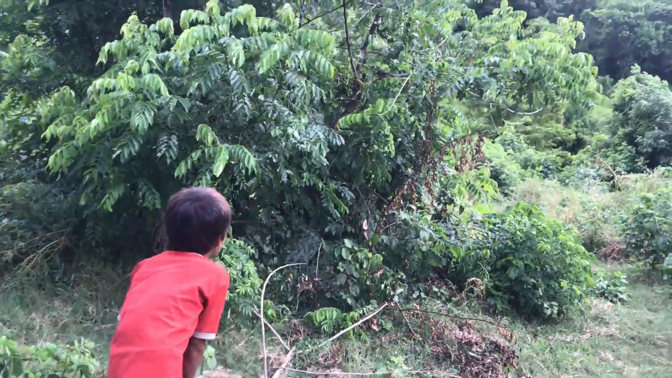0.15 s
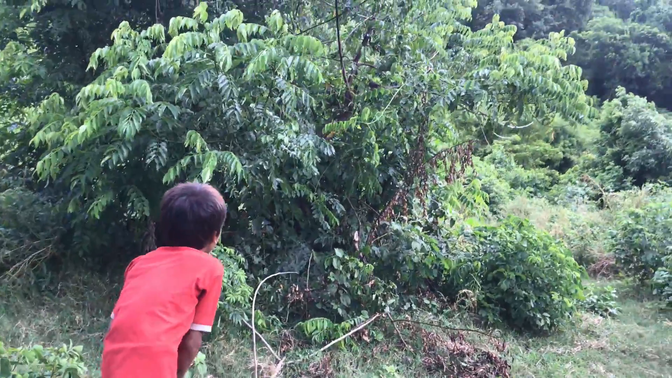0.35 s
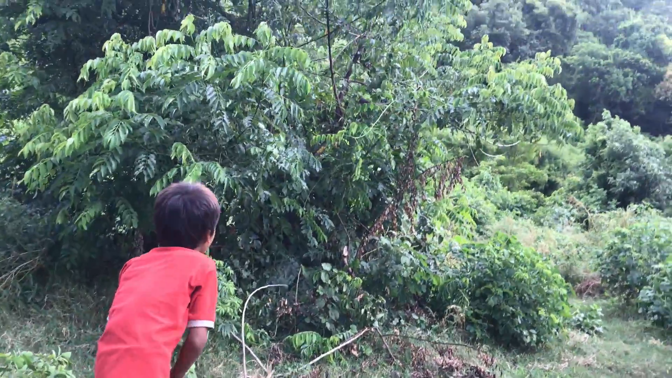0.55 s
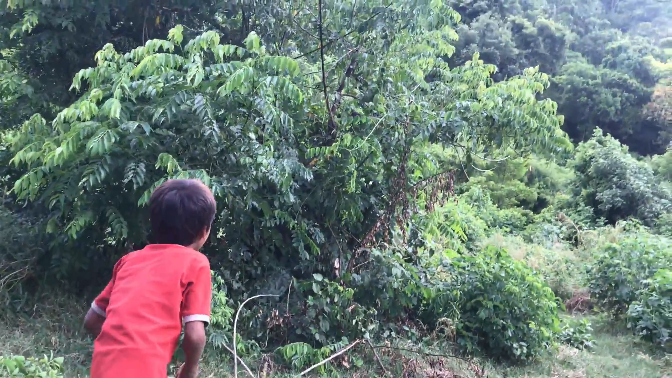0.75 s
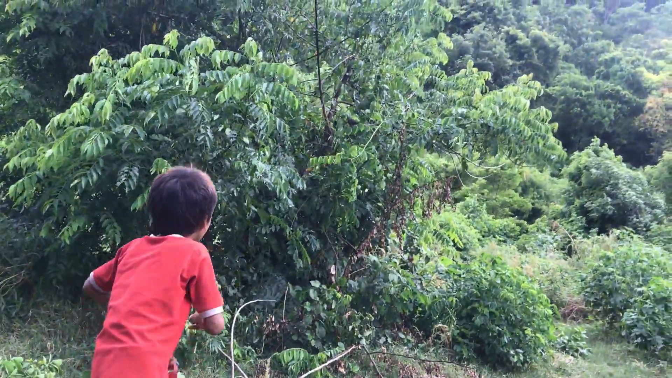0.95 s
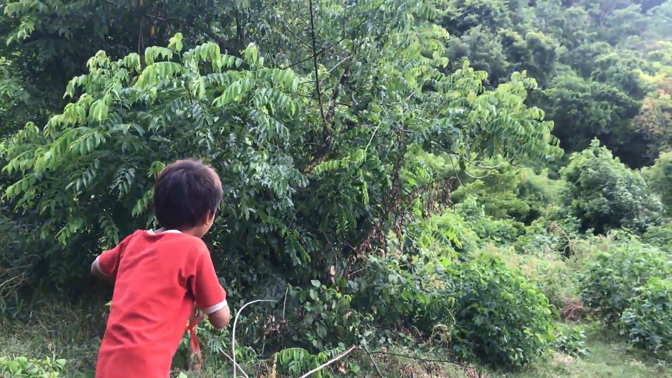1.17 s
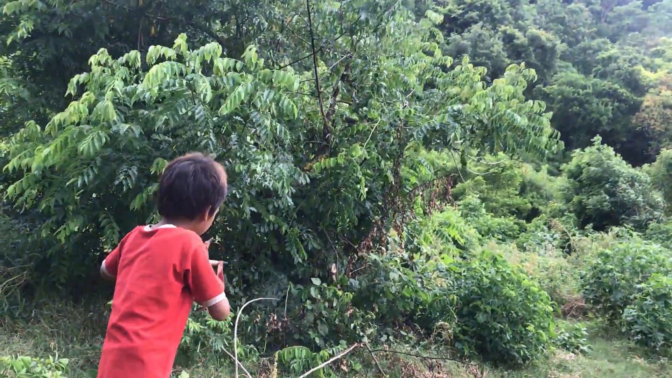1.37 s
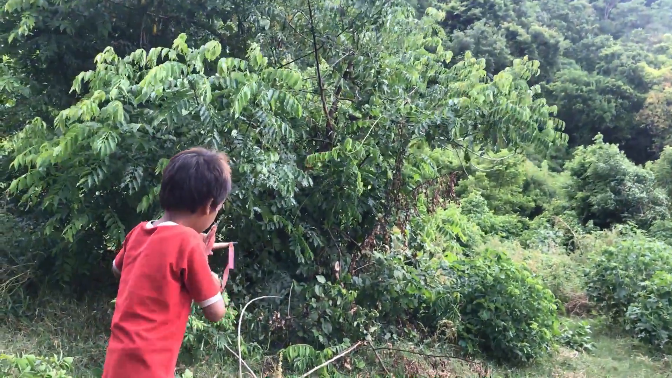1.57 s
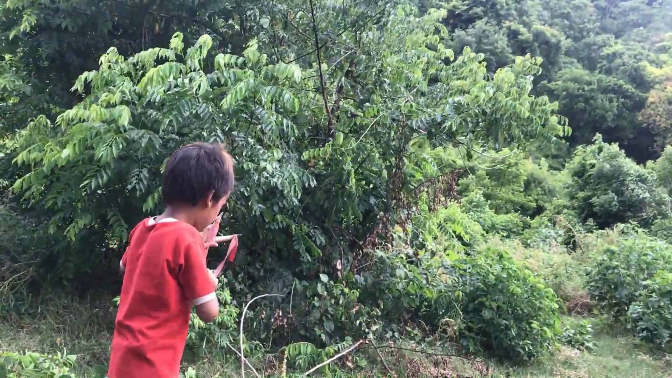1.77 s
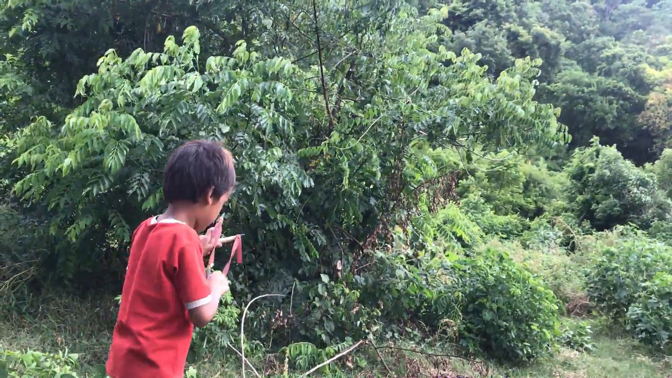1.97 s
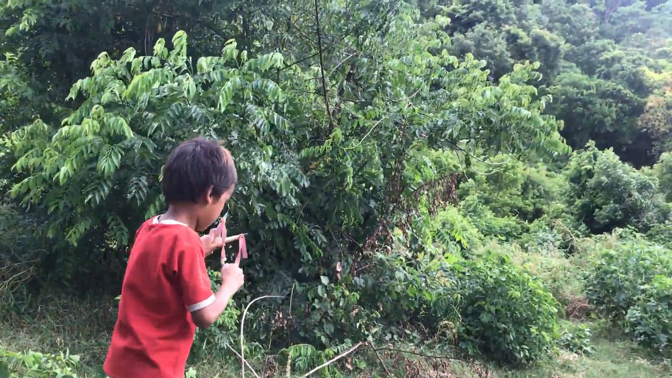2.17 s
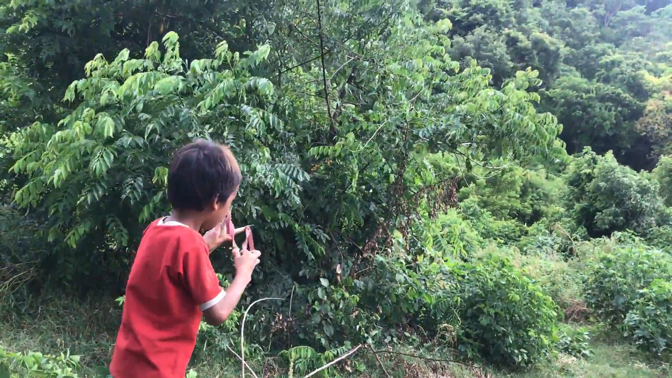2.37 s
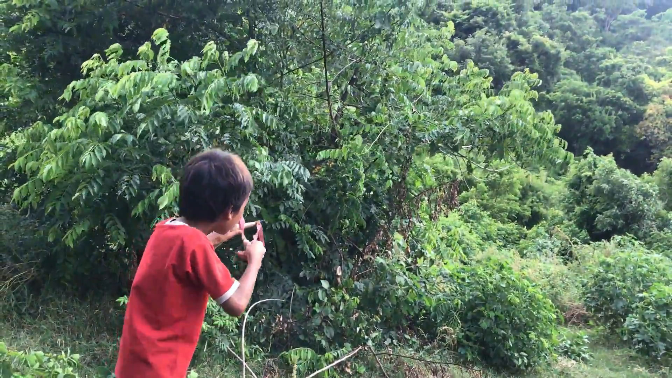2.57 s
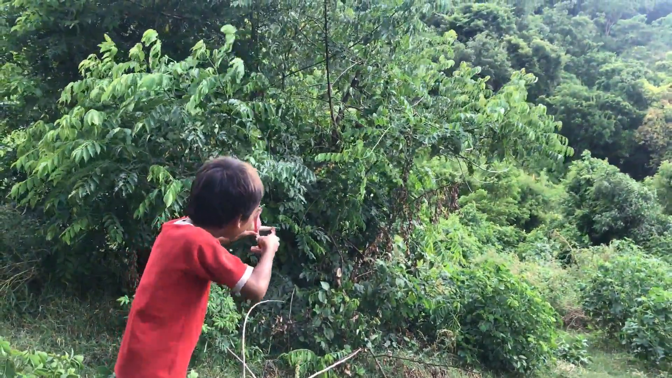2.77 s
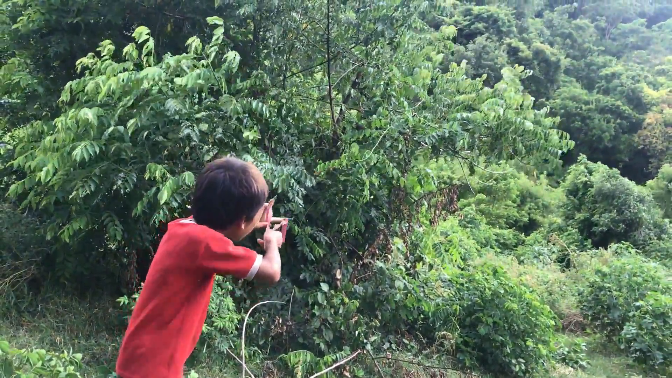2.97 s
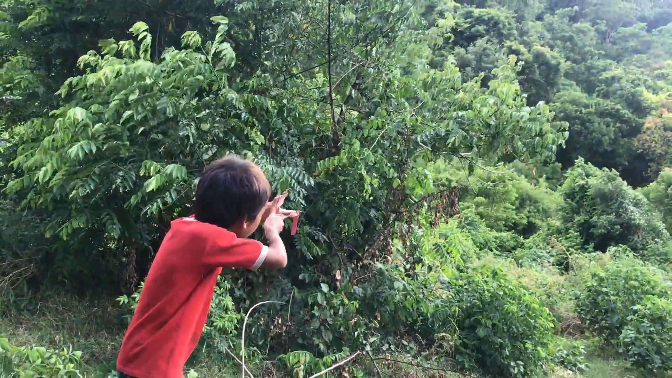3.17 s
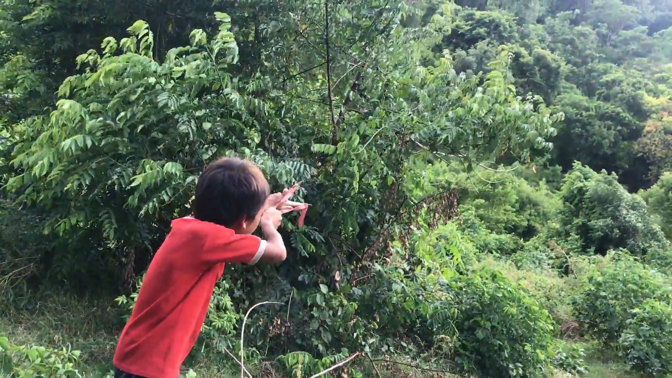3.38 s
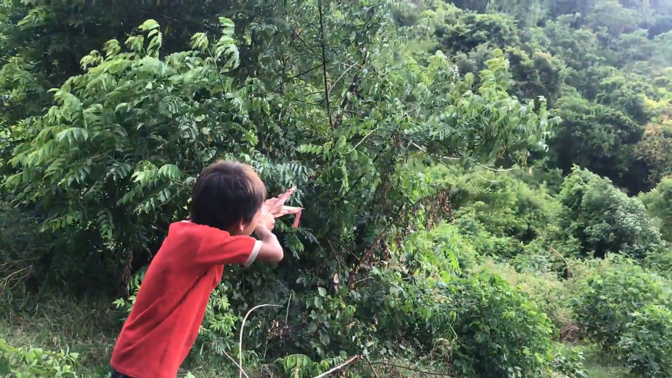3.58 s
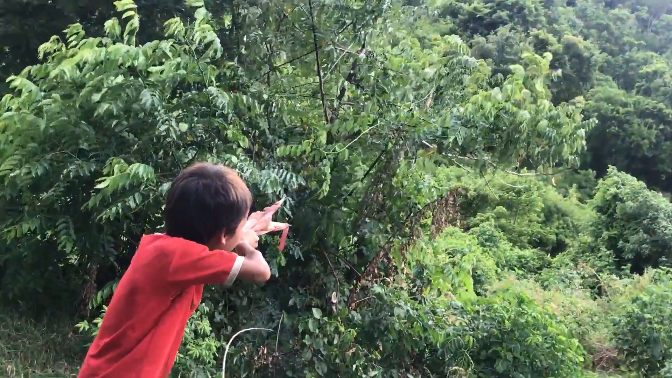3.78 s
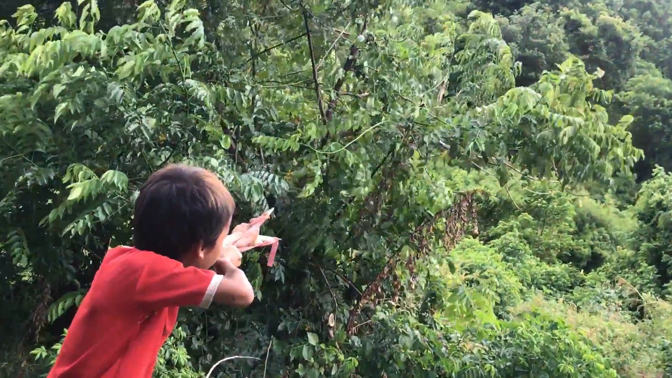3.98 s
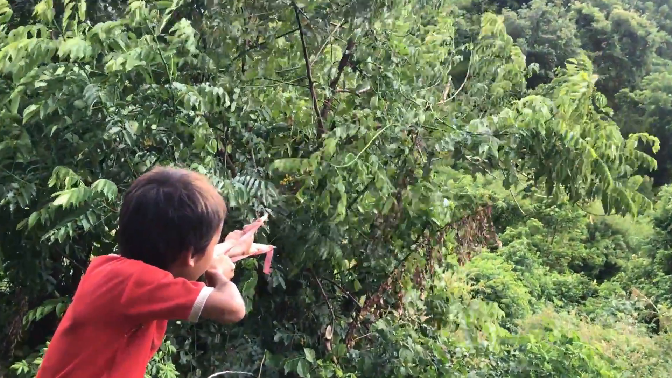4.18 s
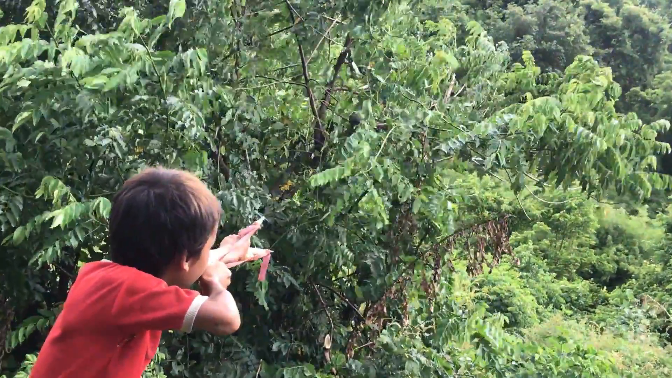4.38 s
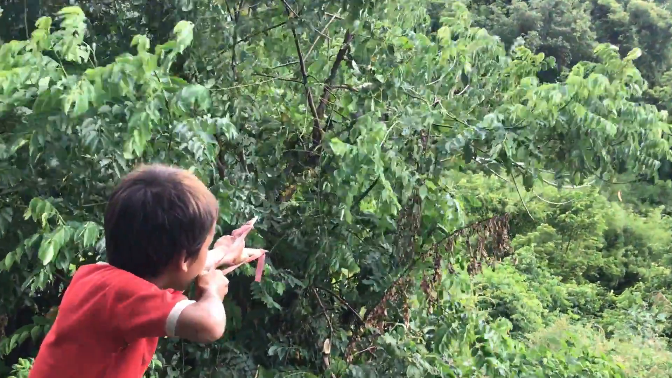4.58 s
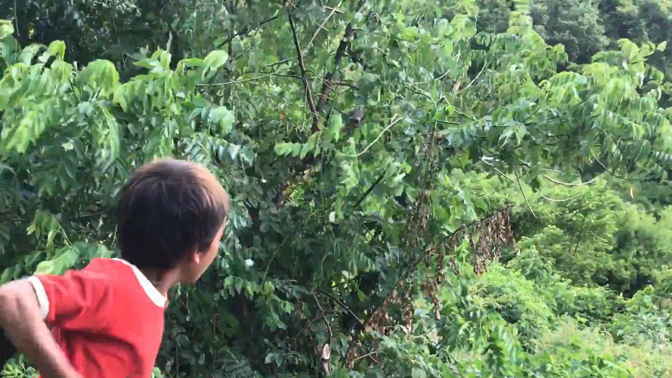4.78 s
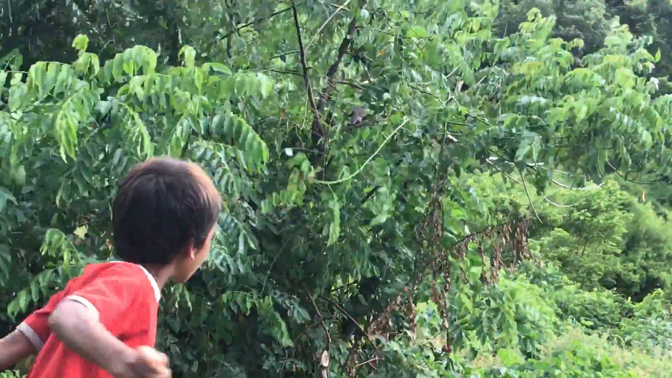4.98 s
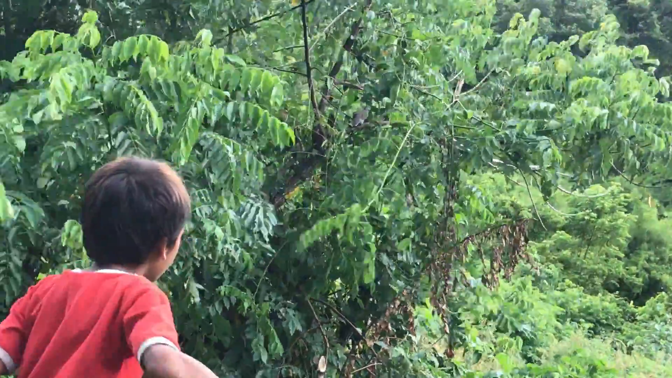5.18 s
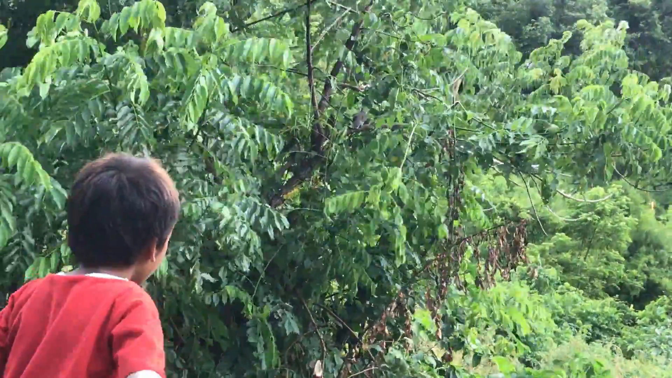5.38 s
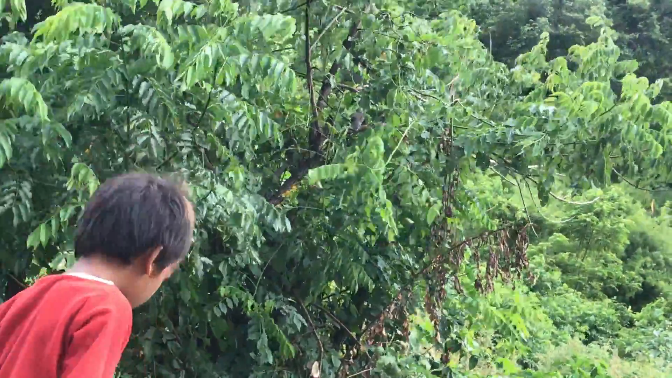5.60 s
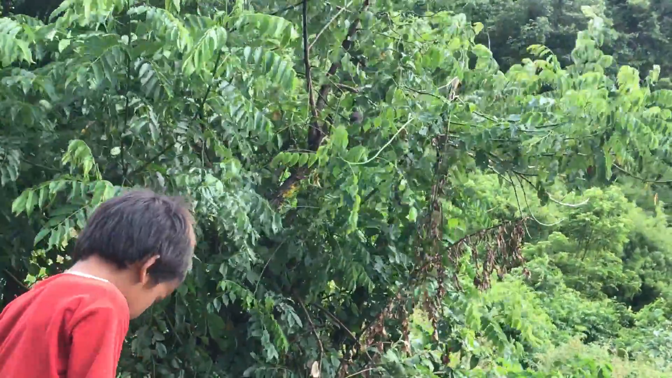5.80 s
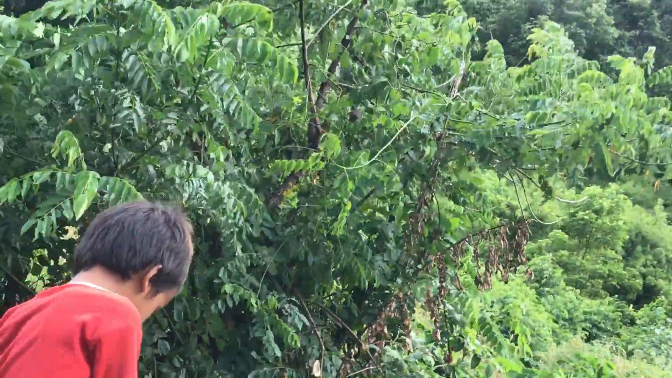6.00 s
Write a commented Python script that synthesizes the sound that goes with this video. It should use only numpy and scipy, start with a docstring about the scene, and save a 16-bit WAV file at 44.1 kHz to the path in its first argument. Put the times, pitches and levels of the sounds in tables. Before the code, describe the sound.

Crickets sing steadily in breezy bushes, then a slingshot snaps sharply once and its stone ticks faintly through the leaves.

```python
"""At the edge of dense bushes, crickets sing over a far chorus, some in falling pulses, some in long
sinking notes, each a wing resonance that drops in pitch as the stroke slows. A breeze rises, hisses in
the leaves and puffs on the microphone. Something small and metal jingles. Then a slingshot is shot:
the pouch slips, the rubber cracks and slaps the fork, and the stone ticks through the leaves."""
import sys
import numpy as np
from scipy import signal
from scipy.fft import rfft, irfft, next_fast_len
from scipy.io import wavfile
from scipy.ndimage import map_coordinates

SR = 44100
rng = np.random.default_rng(int(sys.argv[2]) if len(sys.argv) > 2 else 0)


def generate_wav(signal):
    """Clip the signal to [-1, 1] and save it as 16-bit WAV at the path in sys.argv[1]."""
    frames = np.transpose(np.atleast_2d(signal))
    scaled = np.clip(frames, -1, 1) * 32767
    pcm = np.round(scaled).astype(np.int16)
    wavfile.write(sys.argv[1], SR, pcm)


N = 266628


def amp(db):
    """Decibels to amplitude ratio."""
    return 10 ** (np.asarray(db) / 20)


def unit(x):
    """Normalisation to rms 1."""
    return x / np.sqrt(np.mean(x ** 2) + 1e-20)


def along(points, hz):
    """Interpolation of (frequency_hz, value) points on a log frequency axis."""
    knots_hz, values = np.transpose(points)
    return np.interp(np.log(hz + 1), np.log(knots_hz + 1), values)


def curve(points):
    """Linear interpolation of (time_s, value) points at every sample."""
    return np.interp(np.arange(N) / SR, *np.transpose(points))


def wobble(rate, size=N):
    """Smooth random modulation, rate knots a second."""
    knots = rng.standard_normal(int(size * rate / SR) + 4)
    return map_coordinates(knots, [np.arange(size) * rate / SR])


def filtered(x, response):
    """Zero-phase filtering: the spectrum of x times a frequency response."""
    size = next_fast_len(len(x) + 8192)
    return irfft(rfft(x, size) * response(np.fft.rfftfreq(size, 1 / SR)), size)[:len(x)]


def noise(spectrum, size=N):
    """Noise of rms 1, coloured by (frequency_hz, level_db) points."""
    return unit(filtered(rng.standard_normal(size), lambda hz: amp(along(spectrum, hz))))


def decay(t, t60):
    """Exponential damping: 60 dB in t60 seconds."""
    return np.exp(-np.log(1000) * t / t60)


def add(track, start_s, sound):
    """Superposition of a sound on the track."""
    start = round(start_s * SR)
    part = sound[max(-start, 0):max(N - start, 0)]
    track[max(start, 0):][:len(part)] += part


# Reverberation time of the bushes: frequency_hz, t60_s
BUSH_DECAY = [(200, 0.14), (1200, 0.1), (3200, 0.37), (7000, 0.26), (15000, 0.24)]

def bushes(x):
    """Scattering: leaves and ground return a tail in which each frequency decays at its own rate."""
    hz, t, spectra = signal.stft(rng.standard_normal(SR // 2), SR, nperseg=256)
    colour = amp(along([(300, 7), (1200, -26), (3300, -7), (7000, -3), (15000, -2.5)], hz))
    damping = decay(t, along(BUSH_DECAY, hz)[:, None])
    tail = signal.istft(spectra * colour[:, None] * damping, SR, nperseg=256)[1]
    tail *= 1 - np.exp(-np.arange(len(tail)) / SR / 0.0045)
    return signal.fftconvolve(x, tail / np.linalg.norm(tail))[:N]


# Spectra of the rumble, the air in the foliage and the leaf hiss: frequency_hz, density_db
RUMBLE_SPECTRUM = [(12, -52), (22, -50), (35, -11.5), (54, -1), (134, -8), (217, -15.5), (260, -18.5),
                   (300, -18.5), (450, -25), (580, -67), (990, -120)]
AIR_SPECTRUM = [(150, -11), (350, -2), (650, 0), (1100, -1), (2000, -4), (4500, -6.5), (7000, -8),
                (9000, -22.5), (16000, -36)]
HISS_SPECTRUM = [(4000, -34), (7000, -6.5), (8700, 2), (10400, -3), (11200, 0.5), (12600, 0), (15800, -5.5)]
# Strength of the breeze: time_s, level_db
BREEZE_LEVEL = [(0.0, -66), (0.5, -68.5), (1.59, -66), (3.58, -66), (4.1, -62), (5.0, -59), (6.03, -59.5)]

def breeze():
    """Flow noise: rumble, air in the foliage and leaf hiss all grow with one breeze."""
    breeze_db = curve(BREEZE_LEVEL)
    rise_db = breeze_db - breeze_db.mean()
    rumble = amp(-54 + 0.23 * rise_db + 0.73 * wobble(7.1)) * noise(RUMBLE_SPECTRUM)
    air = amp(-55.5 + 0.53 * rise_db + 0.54 * wobble(12)) * noise(AIR_SPECTRUM)
    hiss = amp(breeze_db + 0.5 + wobble(45)) * noise(HISS_SPECTRUM)
    return rumble + air + hiss


def wing_tone(length_s, first_hz, last_hz, waver_hz, flutter_db, edge, scoop_hz=0):
    """Resonance of a cricket's wing: a nearly pure tone that sinks as the stroke slows."""
    progress = np.linspace(0, 1, int(length_s * SR))
    size = len(progress)
    flat_hz = scoop_hz * np.exp(-progress * length_s / 0.0294)  # while the wings gather speed
    hz = first_hz + (last_hz - first_hz) * progress - flat_hz + waver_hz * wobble(118.3, size)
    swell = np.abs(np.sin(np.pi * progress)) ** edge * amp(flutter_db * wobble(68.4, size))
    phase = 2 * np.pi * np.cumsum(hz) / SR
    return swell * (np.sin(phase) + amp(-26) * np.sin(2 * phase))


# Lower band of the chorus: frequency_hz, density_db
NOTE_BAND = [(4500, -45), (4950, -22), (5230, -8), (5480, 9), (5750, -2), (5950, 2), (6300, -47)]
# Its slow swell: time_s, level_db
NOTE_BAND_LEVEL = [(0.0, -61), (0.48, -63.5), (0.92, -59), (2.6, -60), (3.34, -59), (3.68, -63),
                   (4.82, -58), (6.03, -58)]

def far_notes(calls_per_s=34, lowest_hz=5170, spread_hz=620, rise_hz_per_s=42):
    """Incoherent summation: the sinking notes of many far crickets blur into one band."""
    notes = np.zeros(N)
    for when, pitch, nearness in rng.random((int(calls_per_s * N / SR), 3)):
        time_s = when * N / SR
        hz = lowest_hz + spread_hz * pitch ** 1.3 + rise_hz_per_s * time_s
        note = wing_tone(0.261, hz, hz - 100, waver_hz=18.6, flutter_db=3.5, edge=1)
        add(notes, time_s - 0.1, amp(5.9 * nearness - 6 * pitch) * note)
    level_db = curve(NOTE_BAND_LEVEL) - 4.5 + 0.63 * wobble(35)
    return amp(level_db) * (unit(notes) + noise(NOTE_BAND))


def answering_gain(floor_db=-69.5, answer_db=-64.5, half_s=0.16):
    """Addition of powers: the far pulse singers swell around each run of the near cricket."""
    t = np.arange(N) / SR
    mean_db = np.mean([db for _, _, db in PULSE_RUNS])
    power = amp(floor_db) ** 2
    for start_s, count, db in PULSE_RUNS:
        middle_s = start_s + count * PULSE_SPACING_S / 2
        swell = np.exp(-((t - middle_s) / half_s) ** 2)
        power = power + amp(answer_db + 0.35 * (db - mean_db)) ** 2 * swell
    return np.sqrt(power)


# Upper band of the chorus: frequency_hz, density_db
PULSE_BAND = [(5500, -35), (6000, 0), (6350, 11), (6700, -5.5), (7100, -7), (7700, -30)]

def far_pulses(calls_per_s=110):
    """Incoherent summation: the falling pulses of far crickets merge into a higher band."""
    pulses = np.zeros(N)
    for when, pitch, nearness in rng.random((int(calls_per_s * N / SR), 3)):
        hz = 6800 + 480 * pitch
        pulse = wing_tone(0.0445, hz, hz - 850, waver_hz=41.2, flutter_db=2, edge=3.1)
        add(pulses, when * N / SR - 0.02, amp(3.7 * nearness) * pulse)
    return answering_gain() * (unit(pulses) + amp(-3) * noise(PULSE_BAND))


# Runs of the near cricket: start_s, pulse_count (rounded when played), level_db
PULSE_RUNS = [(.195, 3.7, -54), (1.066, 2.8, -56.5), (1.548, 2.7, -54.5), (2.02, 2.2, -64),
              (2.256, 0.5, -56), (2.922, 5.3, -56), (3.238, 3.1, -62), (3.787, 4.6, -57), (4.26, 3.3, -57),
              (4.943, 3.3, -55), (5.297, 2.6, -66), (5.675, 2.5, -53.5)]
PULSE_SPACING_S = 0.0555

def pulsing_cricket(scatter_hz=45):
    """Pulsed resonance: short downward glides, in runs that grow louder toward their end."""
    pulses = np.zeros(N)
    for start_s, count, db in PULSE_RUNS:
        for k in range(round(count)):
            growth_db = -4 * (1 - (k + 1) / round(count)) ** 2
            off_hz = scatter_hz * rng.standard_normal()
            pulse = wing_tone(0.05, 7020 + off_hz, 6080 + off_hz, waver_hz=31, flutter_db=2.5, edge=0.85)
            add(pulses, start_s + k * PULSE_SPACING_S - 0.006, amp(db + growth_db + 3) * pulse)
    return pulses + amp(-11) * bushes(pulses)


# Long cricket notes: start_s, length_s, pitch_hz, level_db
LONG_NOTES = [(-.03, .13, 5345, -57), (0.602, 0.17, 5450, -70), (.77, 0.25, 5490, -60),
              (.88, .17, 5250, -61), (3.12, 0.21, 5535, -56), (3.36, .24, 5450, -53.5),
              (3.55, .2, 5400, -63), (3.748, 0.41, 5760, -60), (3.83, 0.95, 5520, -58),
              (4.294, 0.23, 5700, -60), (4.29, 0.14, 5510, -54.5), (4.47, 0.17, 5510, -55.5),
              (4.69, 0.22, 5610, -51), (4.979, .35, 5540, -57), (5.293, 0.36, 5730, -62),
              (5.403, 0.29, 5490, -54), (5.6, 0.22, 5490, -54), (5.701, 0.3, 5730, -55.5),
              (5.8, 0.23, 6020, -61)]

def long_note_crickets(sag_hz_per_s=310):
    """Sustained resonance: long sinking notes, and one almost level trill at the start."""
    notes = np.zeros(N)
    for start_s, length_s, hz, db in LONG_NOTES:
        last_hz = hz - sag_hz_per_s * length_s
        note = wing_tone(length_s, hz, last_hz, waver_hz=11.6, flutter_db=2.5, edge=0.3, scoop_hz=49.6)
        add(notes, start_s, amp(db) * note)
    trill = wing_tone(2.3, 5690, 5580, waver_hz=11, flutter_db=1.5, edge=0.19)
    add(notes, 0, amp(-64.5) * trill)
    return notes + amp(-11) * bushes(notes)


# The stronger puffs of wind: centre_s, level_db, half_length_s, upper_edge_hz
STRONG_EDDIES = [(3.389, -37.5, 0.0095, 100), (3.421, -27, .011, 152), (3.54, -36, .022, 129),
                 (3.771, -35.5, 0.006, 215), (4.073, -33.5, 0.007, 137), (4.139, -33, 0.023, 220),
                 (4.447, -35.5, .011, 228), (4.66, -21, 0.0066, 270), (4.672, -27.5, .025, 189),
                 (4.769, -33.5, 0.023, 127), (4.892, -31, .017, 285), (5.176, -39.5, 0.035, 107),
                 (5.557, -35, .018, 130), (5.761, -24.5, 0.014, 220), (5.851, -35.5, 0.048, 152),
                 (5.923, -24.5, 0.015, 183), (6.018, -22.5, 0.017, 290), (6.043, -18, 0.011, 200)]

def wind_puffs():
    """Turbulence: each eddy shakes the microphone for a few low cycles, inside a slower, deeper swell."""
    out = np.zeros(N)
    t = np.arange(-SR // 8, SR // 8) / SR
    low_cut = lambda hz: (hz / 46) ** 4 / (1 + (hz / 46) ** 4)
    burst = lambda half_s: rng.standard_normal(len(t)) * np.exp(-(t / half_s) ** 2)
    weak_eddies = [(centre_s, -43.5, 0.039, 150) for centre_s in rng.uniform(3.5, 4.9, size=10)]
    for centre_s, db, half_s, edge_hz in STRONG_EDDIES + weak_eddies:
        eddy = filtered(burst(half_s), lambda hz: low_cut(hz) / np.sqrt(1 + (hz / edge_hz) ** 7))
        swell = filtered(burst(1.87 * half_s), lambda hz: low_cut(hz) / (1 + (hz / 95) ** 6))
        puff = amp(db - 1) * eddy / np.abs(eddy).max() + amp(db - 7.5) * swell / np.abs(swell).max()
        add(out, centre_s - len(t) / SR / 2, puff)
    return out


# Modes of a small metal object: frequency_hz, level_db, t60_s
METAL_MODES = [(4260, -2, .04), (4760, -10, .04), (8460, -7, .07), (12100, -1, 0.098), (13530, -4, .08),
               (14000, -4, .06), (14660, -2, .07), (15400, -3, .06)]
# Touches that set it ringing: start_s, level_db
METAL_TOUCHES = [(.018, -55), (0.4428, -44.5), (.4829, -52)]

def clinks():
    """Modal vibration: thin metal rings, with a brief scrape at each touch."""
    out = np.zeros(N)
    t = np.arange(SR // 4) / SR
    scrape_spectrum = [(2000, -9), (5000, -6), (10000, -10), (13000, 0), (16000, -5)]
    for start_s, db in METAL_TOUCHES:
        ring = sum(amp(mode_db + rng.normal(0, 1.5)) * np.sin(2 * np.pi * hz * t) * decay(t, t60)
                   for hz, mode_db, t60 in METAL_MODES)
        scrape = noise(scrape_spectrum, len(t)) * decay(t, 0.04)
        add(out, start_s, amp(db - 5) * ring + amp(db) * scrape)
    return out


# Contacts of fingers, twigs and leaves: start_s, level_db, centre_hz, width_octaves, t60_s
SMALL_CONTACTS = [(.672, -48.5, 1090, .6, .028), (1.921, -46.5, 650, 0.81, .06),
                  (2.2525, -47, 1590, 0.81, .03), (3.943, -43, 4800, 0.41, .026),
                  (4.8036, -36.5, 4800, 1.4, .015), (4.804, -38, 2910, .096, 0.056),
                  (4.8231, -35.5, 4200, 5.3, 0.097), (4.836, -37, 900, 1.8, .06),
                  (5.046, -43.5, 2740, 0.65, 0.05), (5.299, -44.5, 2700, .35, .045)]

def ticks(contacts):
    """Impact noise: each dry tick is a sharp contact and a short grainy burst in its own band."""
    out = np.zeros(N)
    t = np.arange(SR // 8) / SR
    for start_s, db, centre_hz, octaves, t60 in contacts:
        band = lambda hz: 1 / (1 + (np.log2((hz + 1) / centre_hz) / octaves) ** 2)
        grains = rng.standard_normal(len(t)) * amp(wobble(1500, len(t)))
        envelope = (decay(t, t60) + 0.6 * decay(t, 0.0095)) * (1 - np.exp(-t / 0.00017))
        add(out, start_s, amp(db) * unit(filtered(grains, band)) * envelope)
    return out


def stone(start_s=4.963, gap_s=0.0103, first_hz=3300, octaves=0.69, t60=0.066):
    """Successive impacts: each leaf the stone meets lies deeper in the bush, duller and weaker."""
    return ticks([(start_s + leaf * gap_s, -43.5 - 0.5 * leaf, first_hz * 0.66 ** leaf, octaves, t60)
                  for leaf in range(4)])


# Spectrum of fluttering rubber: frequency_hz, density_db
RUBBER_SPECTRUM = [(200, -23), (380, -5), (620, 0), (900, -7.5), (1700, -1), (2400, -4), (4000, 1.5),
                   (6000, -2), (7500, -6.5), (11000, -6), (15800, -10.5)]
# Brief tones that colour the snap's tail: frequency_hz, level_db, t60_s
SNAP_TAIL_TONES = [(1250, -10, 0.056), (1710, -11, 0.016), (2525, -5, 0.093), (2890, -4, 0.14),
                   (3300, -12, 0.1), (3445, -10, 0.086), (4100, -5, 0.092), (4480, -3, 0.058),
                   (4800, -5, 0.096), (5843, -4, 0.084)]
# Blows of rubber and pouch: start_s, crack_db, crack_hz, flutter_db, flutter_t60_s
BLOWS = [(4.8679, -20.5, 3170, -37, 0.019), (4.908, -13, 6000, -24, 0.031),
         (4.9095, -9.5, 4360, -31, 0.023), (4.9112, -32, 2400, -50, 0.034), (4.9358, -23, 7000, -35, 0.013),
         (4.9365, -11, 1970, -21.5, 0.05), (4.9385, -14, 3560, -29, 0.049)]

def slingshot():
    """Impulsive excitation: each blow is a one-cycle crack, rubber flutter and a short ringing tail."""
    out = np.zeros(N)
    t = np.arange(SR // 4) / SR
    attack = 1 - np.exp(-t / 0.00063)
    for start_s, crack_db, crack_hz, flutter_db, flutter_t60 in BLOWS:
        cycles = t * crack_hz
        crack = np.sin(2 * np.pi * cycles) * np.exp(-((cycles - 0.5) / 0.45) ** 2)  # a push, then a pull
        flutter = noise(RUBBER_SPECTRUM, len(t)) * decay(t, flutter_t60)
        ring = sum(amp(db + rng.normal(0, 1)) * np.sin(2 * np.pi * (hz * t + rng.random()))
                   * decay(t, t60) for hz, db, t60 in SNAP_TAIL_TONES)
        tail = (flutter + amp(-16.5) * ring) * attack
        add(out, start_s, amp(crack_db - 3.5) * crack + amp(flutter_db + 0.5) * tail)
    return out


def scene():
    """Superposition: all sources sum at one microphone, which feeds both channels."""
    near = slingshot() + ticks(SMALL_CONTACTS) + stone() + clinks()
    scattered = amp(-13) * bushes(near)
    crickets = pulsing_cricket() + long_note_crickets() + far_notes() + far_pulses()
    mono = near + scattered + crickets + breeze() + wind_puffs()
    return np.array([mono, mono])


def record(dry):
    """Band limiting: an ideal low-pass filter removes the highest treble."""
    return np.array([filtered(channel, lambda hz: hz < 15850) for channel in dry])


dry = scene()
out = record(dry)
generate_wav(out)
```